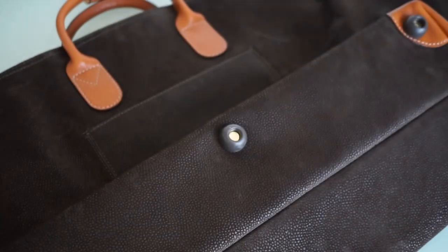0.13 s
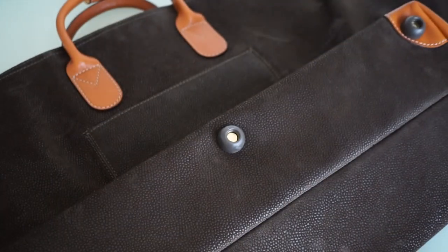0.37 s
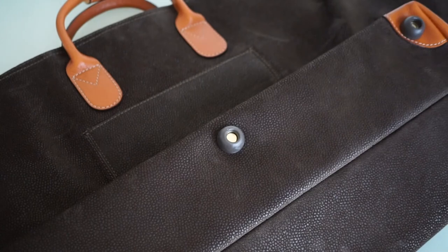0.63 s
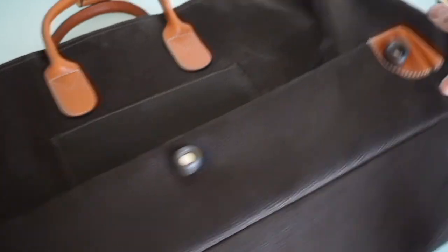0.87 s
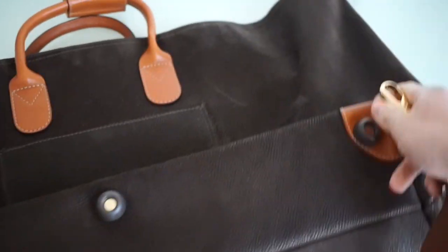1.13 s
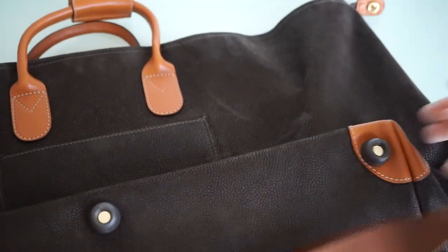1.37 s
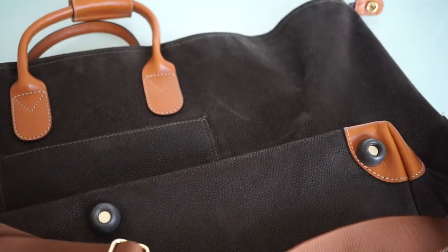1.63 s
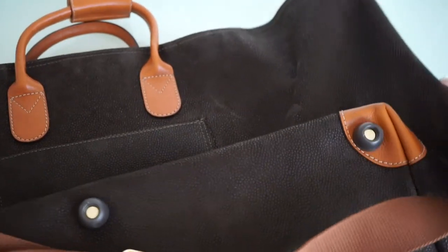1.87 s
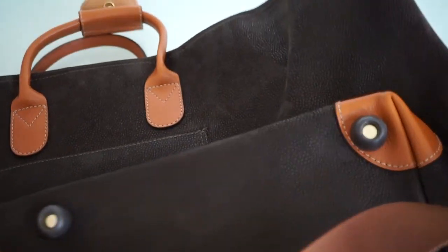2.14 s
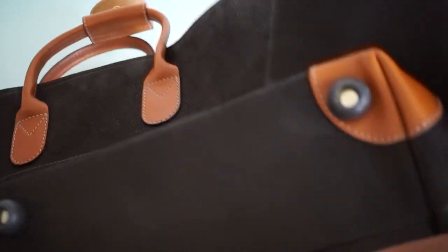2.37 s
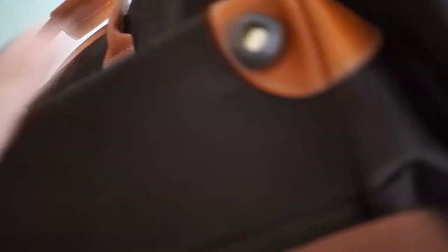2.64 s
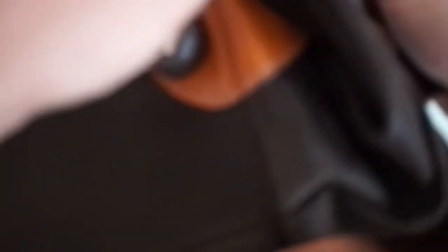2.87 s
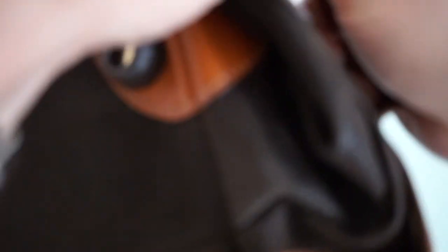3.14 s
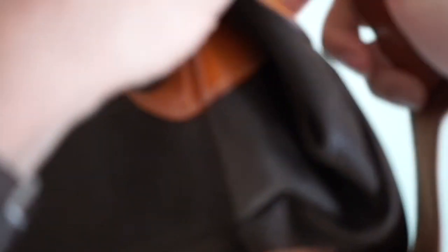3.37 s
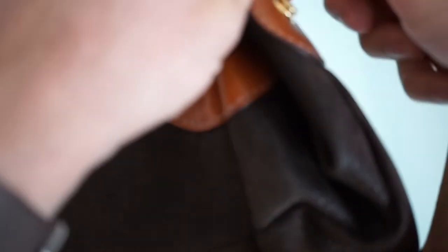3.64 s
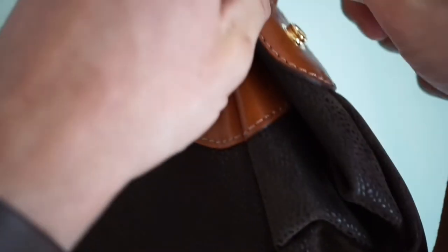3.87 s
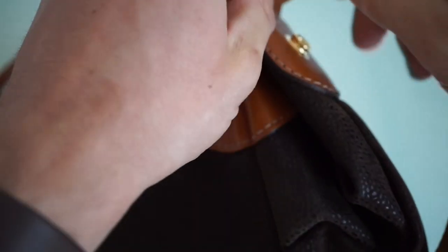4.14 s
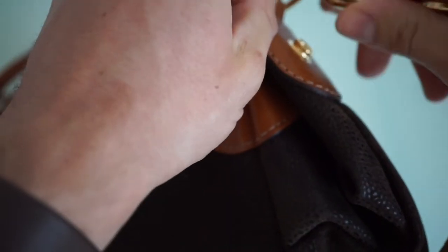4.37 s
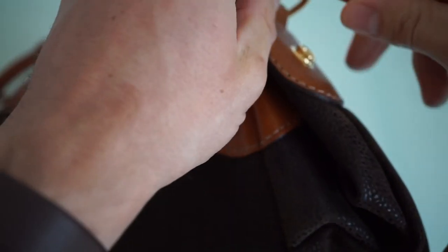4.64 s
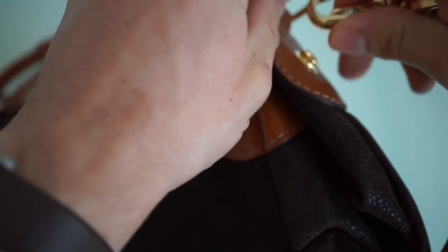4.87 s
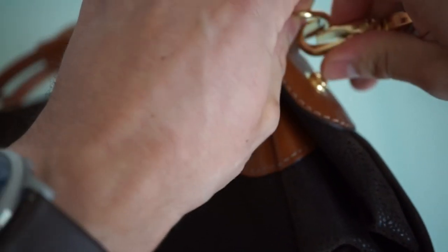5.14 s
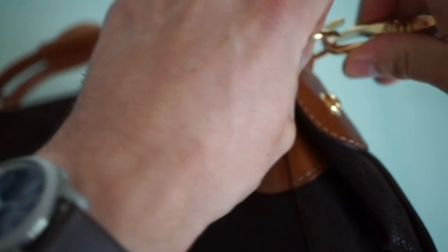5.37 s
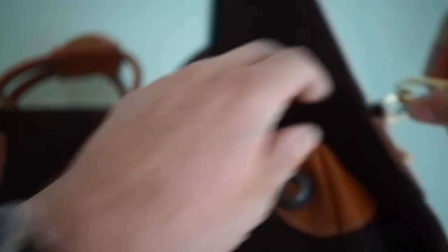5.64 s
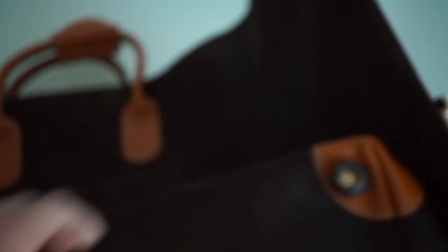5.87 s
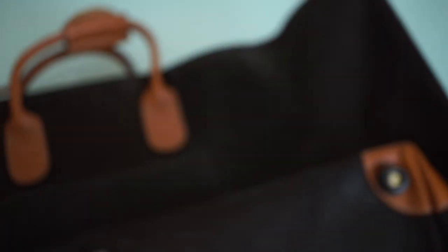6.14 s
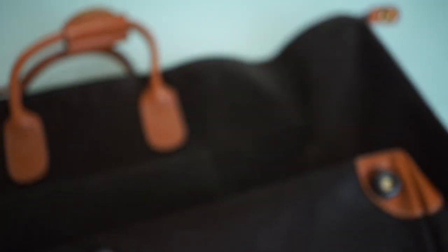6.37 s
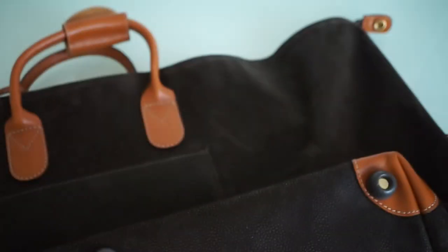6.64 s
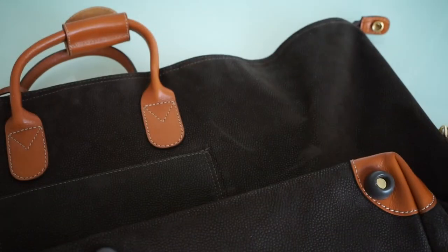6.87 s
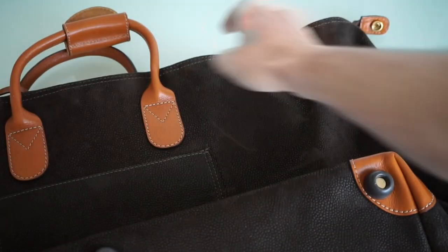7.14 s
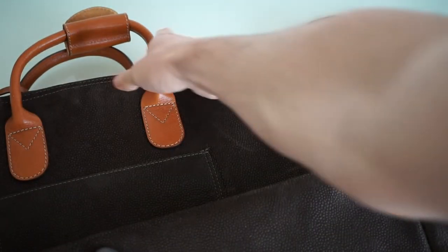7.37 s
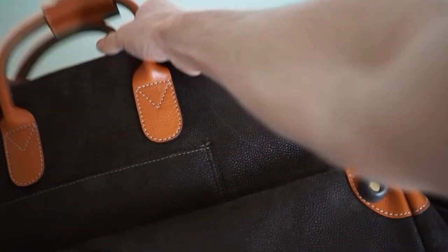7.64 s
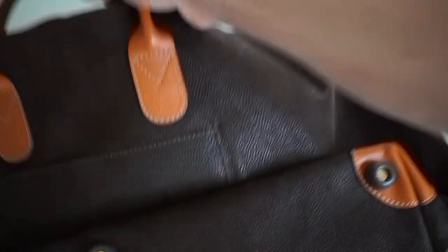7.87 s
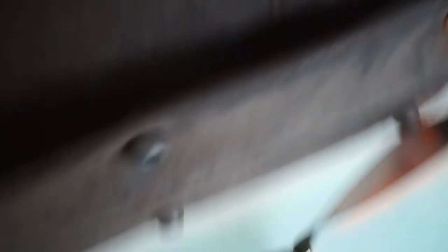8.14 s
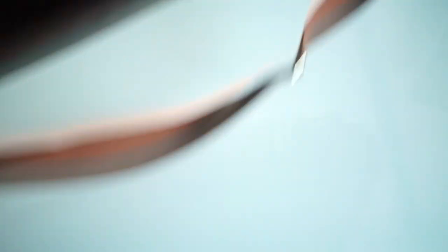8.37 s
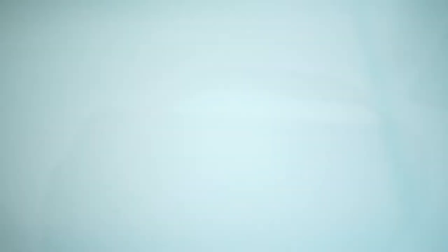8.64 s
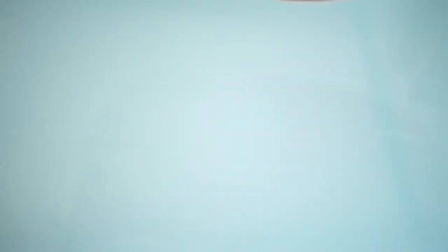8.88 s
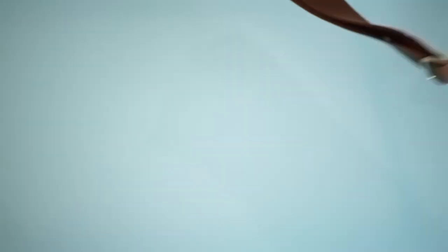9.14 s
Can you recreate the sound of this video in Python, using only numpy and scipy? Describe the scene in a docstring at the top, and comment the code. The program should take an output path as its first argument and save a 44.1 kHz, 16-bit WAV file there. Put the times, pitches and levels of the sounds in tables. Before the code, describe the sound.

Close leather handling: a short scraping drag, muffled thuds and small metal clicks, then strap hardware striking hard with sharp, echoing clacks.

```python
"""Leather bag handled on a table

Strokes and a drag of leather: gritty noise through table modes, folds and surface-hiss spectra.
Bumps are damped sines plus a slap, brass ticks are resonant crackle, thin metal rings are sines.
Strap hardware clacks further off as filtered pulses; bumps, ticks, clacks and buckle get a bare
room's answer from decaying noise. Rumble and hiss lie under it all.
"""
import sys
import numpy as np
from scipy import signal
from scipy.fft import rfft, irfft, next_fast_len
from scipy.io import wavfile
from scipy.ndimage import map_coordinates

SR = 44100
rng = np.random.default_rng(int(sys.argv[2]) if len(sys.argv) > 2 else 0)


def to_wav(sig):
    """Store sig (one row per channel, or 1-D mono) as 16-bit WAV at the path in sys.argv[1].

    Samples outside -1..1 are clipped; the rate is SR.
    """
    pcm = np.clip(np.atleast_2d(sig), -1, 1) * 32767
    pcm = np.round(pcm).astype(np.int16)
    wavfile.write(sys.argv[1], SR, pcm.T)  # frames by channels


def ratio_of_db(decibels):
    """Turn decibels (scalar or array-like) into linear amplitude factors; 0 dB maps to 1."""
    return 10 ** (np.asarray(decibels, float) / 20)


N = 408366
T = np.arange(N) / SR

# hand strokes: [strongest t/s, length/s, pressure on table/dB, leather flexing/dB]
STROKES = [(0, .3, -61, -69), (0.34, 0.53, -68, -69), (1.427, 0.56, -63, -74), (1.74, 0.76, -64.5, -70),
           (2.106, 0.81, -64, -67.5), (2.51, 0.7, -63, -72.5), (3.1, 0.73, -71.5, -78.5),
           (3.622, 0.57, -72, -77.5), (4.672, 0.29, -70, -75), (4.96, 0.59, -70.5, -77.5),
           (5.15, 0.67, -63.5, -69.5), (5.61, 0.93, -64, -70), (6.09, 0.49, -72, -73),
           (6.42, 1, -71.5, -77), (7.063, 0.67, -73.5, -68.5), (7.428, 0.7, -65.5, -66),
           (7.758, 0.45, -59.5, -60), (8.314, 0.42, -60, -60), (8.546, 0.52, -68, -71),
           (9.12, 0.62, -66.5, -66)]
# strap or hide sliding on the surface: [start t/s, peak t/s, end t/s, peak level/dB]
SLIDES = [(2.197, 2.53, 2.58, -70.5), (7.247, 7.406, 7.8, -70), (7.62, 7.93, 8.1, -66.5),
          (8.1, 8.35, 8.3, -67), (8.55, 9.02, 9.1, -69), (9.028, 9.098, 9.4, -62)]
# bag dragged over the table: [t/s, sliding speed as grain hiss level/dB, weight as body level/dB]
DRAG = [(.52, -81, -67), (.555, -77, -53.5), (.58, -59, -50.5), (.64, -60, -47), (.78, -57.5, -51.5),
        (.92, -54, -46.5), (.965, -58.5, -46.5), (.99, -67.5, -51), (1.125, -68.5, -51.5),
        (1.16, -73, -55.5), (1.24, -82.5, -57.5), (1.3, -95, -79)]
# lowest table modes, droning in the drag: [f/Hz, level re body/dB, strongest t/s]
DRONE = [(130.4, 4, 0.72), (182, -3.5, 0.89)]
# soft leather bumps on the table: [t/s, level/dB, pitch f/Hz, slap level re bump/dB]
BUMPS = [(0.049, -49, 272, -17), (0.235, -36.5, 345, -14.5), (0.773, -37.5, 505, -16),
         (0.834, -35, 498, -27), (0.934, -35.5, 614, -34), (1.124, -38, 330, -18), (1.343, -55, 380, -27),
         (1.386, -51, 620, -1), (1.561, -49, 360, -13), (1.589, -45.5, 540, -29), (1.682, -44, 530, -12),
         (1.918, -51.5, 305, -3.5), (1.991, -48.5, 480, -13), (2.104, -45.5, 360, -6), (2.251, -52, 432, 0),
         (2.297, -45.5, 376, -23), (2.344, -48, 366, -10), (2.508, -36, 627, -7), (2.545, -44.5, 328, -17),
         (2.624, -47, 345, -5.5), (2.65, -53, 135, -30), (3.243, -49, 350, -4), (3.481, -56, 387, -2),
         (4.754, -55.5, 479, -28), (4.875, -54, 335, -3.5), (4.979, -45, 700, -6), (5.043, -44, 465, -10),
         (5.157, -42.5, 470, -8.5), (5.882, -44.5, 343, -10), (6.01, -43.5, 360, -13),
         (6.081, -50.5, 372, -8), (6.354, -42.5, 550, -15), (7.197, -52, 950, -4), (7.25, -53, 570, -21),
         (7.645, -46.5, 594, -12), (7.695, -42.5, 610, -19), (7.849, -36, 710, -4), (8.174, -39, 342, -20),
         (8.48, -43.5, 342, -4), (9.096, -46.5, 650, -8)]
# near brass ticks: [t/s, peak level/dB, centre f/Hz, lower-edge level/dB, top level/dB]
TICKS = [(0.0554, -60, 5720, -7, -10), (1.935, -41.5, 4750, 0, -23), (1.9944, -58, 3530, -4, -4),
         (2.1057, -47, 4500, 20, -18), (2.1559, -45.5, 3760, 11, -28), (2.2533, -52, 3230, 12, -19),
         (2.3497, -51.5, 11100, -17, -18), (2.5115, -47, 9810, -10, -29), (2.6294, -48.5, 4120, 21, -8),
         (3.1768, -54.5, 4800, 4, -33), (3.243, -45.5, 8270, 3.5, -29), (3.481, -55, 5750, -24, -14),
         (3.9906, -64, 5150, 3.5, -20), (4.1573, -57, 4260, 0, -2), (4.5323, -47.5, 8750, -30, -25),
         (4.8748, -50.5, 4600, 3, -12), (4.9801, -35, 5750, -25, -5), (5.0409, -41.5, 5500, 7, -22),
         (5.146, -52, 4330, 0, -21), (5.1583, -43.5, 3300, 9, -35), (5.357, -47.5, 5400, -20, -27),
         (5.363, -45, 3500, -3, -31), (5.4494, -54, 3440, 11, -7), (6.0068, -54.5, 3220, 8, -21),
         (6.423, -49.5, 6300, -26, -5), (7.0666, -53.5, 4440, -0.5, -20), (7.396, -57, 8500, -20, -12),
         (7.418, -51, 5740, -16, -7), (7.4576, -47, 3730, 10.5, -18), (7.7025, -43, 3400, 10, -35),
         (7.8146, -52.5, 4370, -6, -6), (7.8511, -43, 4290, 12, -7), (8.327, -37.5, 4300, 8.5, -11.5),
         (8.3494, -45, 4900, -8, -19), (8.4044, -40.5, 4700, -1.5, -18), (8.7334, -51.5, 3260, 16, -24),
         (9.0468, -45, 5300, -25, -5), (9.0604, -46.5, 10700, -17, -10), (9.0717, -42, 6250, -20, -6)]
# strap hardware falling on the hard surface: [t/s, peak level/dB, low/dB, bright/dB, top/dB]
CLACKS = [(0.1562, -36.5, 0.5, -12, -15.5), (0.3421, -49, -15, -30, -41), (5.3717, -31.5, 3, -31, -24),
          (6.084, -53.5, -8, -7, -36.5), (6.6174, -10, -6, -6, -16.5), (7.575, -46, -18, -17.5, -24.5),
          (7.9449, -12, -10, -14.5, -7.5), (8.0409, -22.5, -13, -12.5, -16), (8.1639, -41, 7, -7, -24)]
# blows that ring the buckle: [t/s, level/dB, pitch rung hardest f/Hz]
BUCKLE_BLOWS = [(.1557, -23, 3530), (6.0855, -40, 2730), (6.6175, -6, 4300), (7.9451, -10.5, 5000),
                (8.0412, -15.5, 4800)]
# buckle modes: [f/Hz, level re blow when aimed at/dB, t60/s]
BUCKLE_MODES = [(1830, -28.5, 1.1), (1820, -26.5, 1.1), (2250, -30, 0.33), (2770, -30.5, .35),
                (3613, -34.5, 0.35), (4300, -37, .5), (4840, -35, 0.22), (5390, -32, .22),
                (8140, -23.5, 0.12)]
# brass ring set singing: [t/s, level/dB]
CHIMES = [(2.35, -68.5), (2.511, -69), (2.647, -81)]
# its modes: [f/Hz, level re chime/dB, t60/s]
RING_MODES = [(2720, -9, 0.8), (11130, 4, 0.35), (14600, -5, .15)]
# clip-spring squeaks: [start t/s, end t/s, start f/Hz, end f/Hz, level/dB]
SQUEAKS = [(.075, .14, 5850, 5800, -79), (5.17, 5.346, 7500, 7000, -86), (5.17, 5.31, 11300, 10800, -90),
           (5.47, 5.56, 9000, 8300, -91), (6.1, 6.42, 8400, 8250, -92)]
# table resonances: [f/Hz, width/Hz, level/dB]
TABLE_MODES = [(263.4, 22.6, -3), (308, 29.7, 0.5), (359, 78, -1.5), (423.4, 42, -2), (484.6, 14.5, 1),
               (547, 29, -5.5), (615, 31, -4.5), (726, 48, -6.5), (813, 66, -8), (974, 51, -12.5),
               (1153, 26, -14)]
# strap hardware and surface resonances: [f/Hz, width/Hz, level/dB]
HARDWARE_MODES = [(128, 11, -2), (292.6, 20.6, -6.5), (481, 16, -0.5), (834, 50, -5), (981, 53, -8),
                  (1183, 21, 1), (1338, 18, -5), (1603, 26, -4.5), (1867, 100, -7.5), (2170, 74, -3.5),
                  (2378, 18, -3.5), (2830, 150, -12.5), (3870, 77, -11.5), (4440, 89, -12.5),
                  (5400, 280, -16), (6240, 430, -12), (8000, 360, -11)]
# spectrum of leather folds: [f/Hz, level/dB]
RUSTLE_SPECTRUM = [(600, -25), (1000, -1), (1800, -2), (2600, -5.5), (4000, -13), (6000, -25)]
# spectrum of leather on the surface: [f/Hz, level/dB]
HISS_SPECTRUM = [(2500, -17), (4000, 5), (5700, 4.5), (8000, 1.5), (11000, -1.5), (13000, -12),
                 (16000, -20.5)]
# spectrum of pebbled hide: [f/Hz, level/dB]
GRAIN_SPECTRUM = [(3820, -40), (6500, -11.5), (9480, 2), (13300, -5.5), (14600, -0.5), (16000, -11)]
# spectrum of scraping studs: [f/Hz, level/dB]
SCRAPE_SPECTRUM = [(590, -24), (1000, -12.5), (1700, -3), (2200, -7.5), (2800, -8), (3600, -16),
                   (5500, -10.5), (7000, -23), (9100, -52), (15400, -120)]
# spectrum of a bump's slap: [f/Hz, level/dB]
SLAP_SPECTRUM = [(300, -30), (800, 11.5), (1300, 13.5), (2200, -4.5), (4000, -21)]
# spectrum of the steady hiss: [f/Hz, level/dB]
AIR_SPECTRUM = [(59, -35), (100, 8), (266, -0.5), (315, 0.5), (415, -11.5), (471, -5), (558, -7.5),
                (2170, -14), (2990, -25), (12900, -22), (16000, -33)]
# spectrum of the building rumble: [f/Hz, level/dB]
RUMBLE_SPECTRUM = [(12, -31), (22, 3.5), (50, -7.5), (66, -8), (85, -19), (110, -26.5), (150, -39),
                   (250, -89)]
# building rumble: [t/s, level/dB]
RUMBLE_LEVEL = [(0.0, -59), (0.2, -59.5), (2.99, -67), (6.16, -65), (6.27, -72), (7.04, -58.5),
                (7.63, -64.5), (9.23, -62), (9.26, -71.5)]
# room decay: [f/Hz, t60/s]
ROOM_T60 = [(130, 0.79), (300, 0.52), (700, 0.44), (1840, 0.57), (3300, 0.49), (4300, 0.53), (5200, 0.46),
            (8000, 0.38), (12800, 0.25)]

STROKE_FADE_DB, SLIDE_FADE_DB = 12, 15  # fall from the peak to the ends
REST_PRESS_DB, REST_FLEX_DB = -80.5, -85  # hands at rest
HISS_DB, HISS_DB_PER_FLEX_DB, FLEX_USUAL_DB = -81.5, 0.36, -68.5  # HISS_DB holds at usual flexing
SCRAPE_DB, SCRAPE_DB_PER_SPEED_DB, FULL_SPEED_DB = -59, 0.58, -56.5  # SCRAPE_DB holds at full speed
LOCK_RISE_DB_S, LOCK_FALL_DB_S = 116, 57  # drone swell and fade rates
BUMP_T60_S, DAMP_DB_PER_SLAP_DB = 0.028, 0.22  # t60 at 0 dB slap; a stronger slap shortens it
TICK_ROOM_DB, ROOM_DB_PER_EDGE_DB = -3, 0.099  # fuller ticks stir the room more
FAINT_TICK_MAX_DB = -61
AIM_DB_PER_OCTAVE = 15.5  # loss of modes away from the aimed pitch
AIR_DB, TOP_HZ = -75.5, 15850


def unit(x):
    """Scale to rms 1."""
    return x / np.sqrt(np.mean(x ** 2) + 1e-20)


def along(points, hz):
    """Read (f/Hz, value) points on a log frequency axis."""
    f, v = np.transpose(points)
    return np.interp(np.log(hz + 1), np.log(f + 1), v)


def spectrum(points):
    """Amplitude response of (f/Hz, level/dB) points."""
    return lambda f: ratio_of_db(along(points, f))


def wobble(rate_hz):
    """Smooth random curve with rate_hz knots a second."""
    knots = rng.standard_normal(int(N * rate_hz / SR) + 4)
    return map_coordinates(knots, [T * rate_hz])


def filtered(x, response):
    """Apply a frequency response to x."""
    m = next_fast_len(len(x) + 8192)
    return irfft(rfft(x, m) * response(np.fft.rfftfreq(m, 1 / SR)), m)[:len(x)]


def modes(table):
    """Causal response of (f/Hz, width/Hz, level/dB) resonances, signs alternating."""
    def response(f):
        return sum((-1) ** k * ratio_of_db(db) * 1j * f * w / (c * c - f * f + 1j * f * w)
                   for k, (c, w, db) in enumerate(table))
    return response


def table_top(f):
    """Table modes; the top radiates little below them."""
    return modes(TABLE_MODES)(f) / (1 + (235 / (f + 1)) ** 8)


def blow(gain_db, size=1024):
    """Causal pulse of peak 1 shaped by gain_db(f): minimum phase by folding the cepstrum."""
    cepstrum = irfft(np.log(ratio_of_db(gain_db(np.fft.rfftfreq(size, 1 / SR))) + 1e-6), size)
    cepstrum[1:size // 2] *= 2
    cepstrum[size // 2 + 1:] = 0
    pulse = irfft(np.exp(rfft(cepstrum)), size)
    return pulse / np.abs(pulse).max()


def gritty(grit_db, count):
    """Noise whose level jumps every count samples, as when rough skin catches and slips."""
    size = np.minimum(rng.exponential(size=N // count + 1), 3).repeat(count)[:N]
    return rng.standard_normal(N) * ratio_of_db(grit_db * size)


def rubbed(response, grit_db, count):
    """Gritty noise through a response, rms 1."""
    return unit(filtered(gritty(grit_db, count), response))


def room_tail():
    """One fresh room answer of energy 1; each frequency decays at its own rate."""
    hz, t, z = signal.stft(rng.standard_normal(SR * 3 // 4), SR, nperseg=256)
    decay = ratio_of_db(-60 * t / along(ROOM_T60, hz)[:, None])
    tail = signal.istft(z * decay, SR, nperseg=256)[1]
    t = np.arange(len(tail)) / SR
    tail *= 1 - np.exp(-t / 0.0019)  # first walls arrive after the direct sound
    tail *= 1 + 0.78 * np.exp(-t / 0.0087)  # table and near walls answer strongest
    return tail / np.linalg.norm(tail)


def add(out, s, sound, tail, wet_db):
    """Place a sound and its room answer at time s."""
    wet = ratio_of_db(wet_db) * signal.fftconvolve(sound, tail)
    wet[:len(sound)] += sound
    part = out[round(s * SR):][:len(wet)]
    part += wet[:len(part)]


def slide_db(start, peak, end, db):
    """Level of one slide: linear in dB up to the peak and down, silent outside."""
    edge_db = db - SLIDE_FADE_DB
    return np.interp(T, [start, peak, end], [edge_db, db, edge_db], left=-140, right=-140)


def strokes():
    """Moved leather shakes the table's modes, rustles in its folds and hisses on the surface."""
    swell_db = np.array([-STROKE_FADE_DB * (2 * (T - s) / length) ** 2 for s, length, _, _ in STROKES])
    press_db, flex_db = np.transpose(STROKES)[2:, :, None]
    body_db = np.maximum((press_db + swell_db).max(axis=0), REST_PRESS_DB)
    rustle_db = np.maximum((flex_db + swell_db).max(axis=0), REST_FLEX_DB)
    flex_hiss_db = HISS_DB + HISS_DB_PER_FLEX_DB * (rustle_db - FLEX_USUAL_DB)
    hiss_db = np.max([flex_hiss_db, *[slide_db(*row) for row in SLIDES]], axis=0)
    jerk = wobble(14)  # uneven stroke, shared by all layers
    body_db = body_db + 1.25 * jerk + 1.7 * wobble(30)
    rustle_db = rustle_db + 0.55 * jerk + 1.2 * wobble(25)
    hiss_db = hiss_db + 0.53 * jerk + 0.4 * wobble(35)
    body = ratio_of_db(body_db) * rubbed(table_top, grit_db=3.5, count=120)
    rustle = ratio_of_db(rustle_db) * rubbed(spectrum(RUSTLE_SPECTRUM), grit_db=2.0, count=60)
    hiss = ratio_of_db(hiss_db) * rubbed(spectrum(HISS_SPECTRUM), grit_db=2.0, count=30)
    return body + rustle + hiss


def table_drone(body_db):
    """Stick and slip lock onto the lowest table modes, which waver a little."""
    out = np.zeros(N)
    for hz, db, s in DRONE:
        lock_db = -np.maximum(LOCK_RISE_DB_S * (s - T), LOCK_FALL_DB_S * (T - s))
        level_db = body_db + db + lock_db + 2.5 * wobble(10.9)
        out += ratio_of_db(level_db) * np.sin(2 * np.pi * hz * T + 0.77 * wobble(8.7))
    return out


def drag():
    """Pebbled hide hisses on the top while its studs scrape and make the table drone."""
    s, *cols = np.transpose(DRAG)
    grain_db, body_db = [np.interp(T, s, c, left=-140, right=-140) for c in cols]
    scrape_db = SCRAPE_DB + SCRAPE_DB_PER_SPEED_DB * (grain_db - FULL_SPEED_DB)
    jerk = wobble(35)
    scrape_db = scrape_db + 1.3 * jerk + 1.7 * wobble(60.5)
    grain = ratio_of_db(grain_db + 0.8 * jerk) * rubbed(spectrum(GRAIN_SPECTRUM), grit_db=2.5, count=30)
    scrape = ratio_of_db(scrape_db) * rubbed(spectrum(SCRAPE_SPECTRUM), grit_db=2.0, count=60)
    body = ratio_of_db(body_db + 0.7 * jerk) * rubbed(table_top, grit_db=1.7, count=120)
    return grain + scrape + body + table_drone(body_db)


def bumps(tails):
    """Soft contact: one strong pitch with a gentle start, other table modes and a dull slap."""
    out, t = np.zeros(N), np.arange(4096) / SR
    for k, (s, db, hz, slap_db) in enumerate(BUMPS):
        others = sum(ratio_of_db(level + rng.normal(0, 3.8)) * np.sin(2 * np.pi * (f * t + rng.uniform()))
                     for f, _, level in TABLE_MODES)
        t60 = BUMP_T60_S * ratio_of_db(-DAMP_DB_PER_SLAP_DB * slap_db)
        envelope = ratio_of_db(-60 * t / t60) * (1 - np.exp(-t / 0.00049))
        bump = (np.sin(2 * np.pi * hz * t) + 0.37 * others) * envelope
        noise = rng.standard_normal(len(t)) * ratio_of_db(-60 * t / 0.082)
        slap = signal.fftconvolve(noise, blow(lambda f: along(SLAP_SPECTRUM, f)))[:len(t)]
        both = bump / np.abs(bump).max() + ratio_of_db(slap_db) * slap / np.abs(slap).max()
        add(out, s, ratio_of_db(db) * both, tails[-k % len(tails)], wet_db=-5.0)
    return out


def faint_ticks(count):
    """Rows like TICKS for faint touches at chance moments, 1872 to 4512 Hz."""
    when, size, pitch = rng.uniform(size=(count, 3)).T
    return [(s * N / SR, FAINT_TICK_MAX_DB - 6 * a, 1872 + 2640 * b, -5, -10)
            for s, a, b in zip(when, size, pitch)]


def ticks(tails):
    """Small brass parts touch: a few ms of bright crackle around one resonance."""
    out, t = np.zeros(N), np.arange(1024) / SR
    for k, (s, db, hz, edge_db, top_db) in enumerate(TICKS + faint_ticks(count=8)):
        colour = [(500, edge_db - 21.0), (1700, edge_db), (3500, -5.0), (7000, -10.0),
                  (12000, top_db), (16000, top_db - 11.5)]
        resonance = modes([(hz, 0.3 * hz, 0)])
        gain_db = lambda f: 20 * np.log10(ratio_of_db(along(colour, f)) + 0.84 * np.abs(resonance(f)))
        crackle = rng.standard_normal(len(t)) * ratio_of_db(-60 * t / 0.023)
        tick = signal.fftconvolve(crackle, blow(gain_db, size=256))
        wet_db = TICK_ROOM_DB + ROOM_DB_PER_EDGE_DB * edge_db
        add(out, s, ratio_of_db(db) * tick / np.abs(tick).max(), tails[k % len(tails)], wet_db)
    return out


def clacks():
    """A hard short blow rings hardware and surface; from afar the room carries most of it."""
    out = np.zeros(N)
    for s, db, low_db, bright_db, top_db in CLACKS:
        colour = [(100, low_db - 11), (400, low_db), (1500, 0), (5300, bright_db),
                  (10500, top_db), (16000, top_db - 17.5)]
        # each fall strikes another spot
        struck = modes([(hz, width, level + rng.normal(0, 1.4)) for hz, width, level in HARDWARE_MODES])
        gain_db = lambda f: along(colour, f) + 20 * np.log10(0.24 + np.abs(struck(f)))
        add(out, s, ratio_of_db(db) * blow(gain_db, size=16384), room_tail(), wet_db=13)
    return out


def buckle(tails):
    """Some blows catch the buckle, whose thin modes ring on; where it is hit decides which."""
    out, t = np.zeros(N), np.arange(SR) / SR
    for (s, db, aim_hz), tail in zip(BUCKLE_BLOWS, tails):
        ring = np.zeros(len(t))
        for hz, level, t60 in BUCKLE_MODES:
            mode_db = level - AIM_DB_PER_OCTAVE * abs(np.log2(hz / aim_hz)) + rng.normal(0, 1.5)
            ring += ratio_of_db(mode_db - 60 * t / t60) * np.sin(2 * np.pi * hz * t)
        add(out, s, ratio_of_db(db) * ring, tail, wet_db=-5.0)
    return out


def chimes():
    """A brass ring sings in a few long thin modes."""
    out = np.zeros(N)
    for s, db in CHIMES:
        t = np.clip(T - s, 0, None)  # sine stays 0 before the onset
        for hz, level, t60 in RING_MODES:
            out += ratio_of_db(db + level - 60 * t / t60) * np.sin(2 * np.pi * hz * t)
    return out


def squeaks():
    """A clip's spring squeaks: thin sines gliding down."""
    out = np.zeros(N)
    for start, end, from_hz, to_hz, db in SQUEAKS:
        u = np.clip((T - start) / (end - start), 0, 1)
        envelope = np.sqrt(np.abs(np.sin(np.pi * u))) * (u < 1)
        phase = 2 * np.pi * np.cumsum(from_hz + (to_hz - from_hz) * u) / SR
        out += ratio_of_db(db) * envelope * np.sin(phase)
    return out


def air():
    """Building rumble of varying level, and steady hiss of room and microphone."""
    rumble = unit(filtered(rng.standard_normal(N), spectrum(RUMBLE_SPECTRUM)))
    hiss = unit(filtered(rng.standard_normal(N), spectrum(AIR_SPECTRUM)))
    return ratio_of_db(np.interp(T, *np.transpose(RUMBLE_LEVEL))) * rumble + ratio_of_db(AIR_DB) * hiss


def scene():
    """Sum of all sources at one microphone."""
    tails = [room_tail() for _ in range(8)]
    handling = strokes() + drag() + bumps(tails)
    metal = ticks(tails) + clacks() + buckle(tails) + chimes() + squeaks()
    return (handling + metal + air())[None]


def band_limit(x):
    """A steep low-pass at the top of the band."""
    return signal.sosfilt(signal.butter(12, 16730, fs=SR, output="sos"), x)


def record(dry):
    """Remove everything from TOP_HZ up."""
    mix = filtered(dry[0], lambda f: f < TOP_HZ)[None]
    return band_limit(mix)


dry = scene()
out = record(dry)
to_wav(out)
```